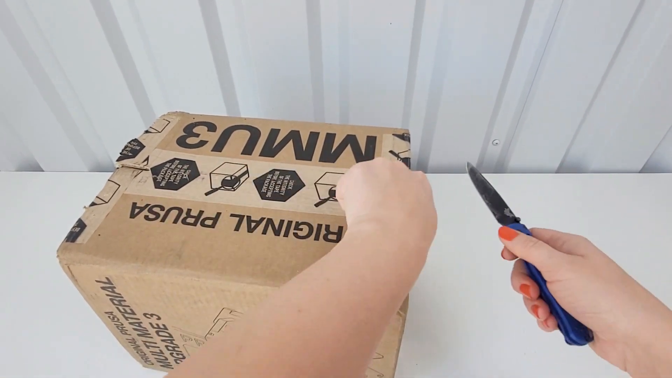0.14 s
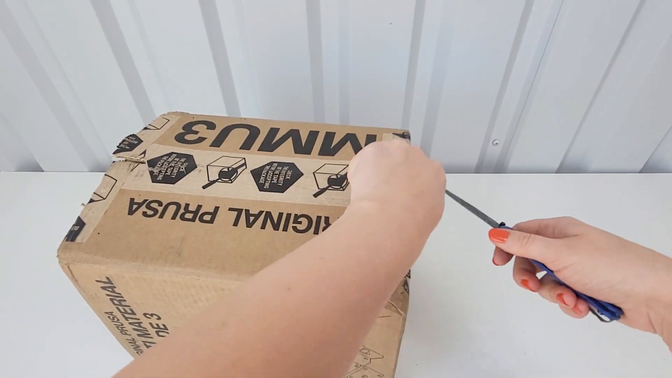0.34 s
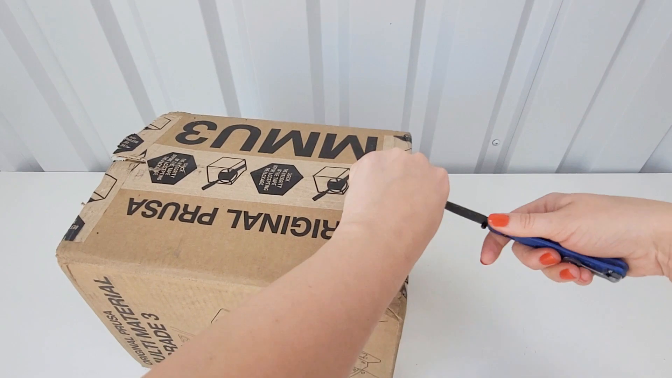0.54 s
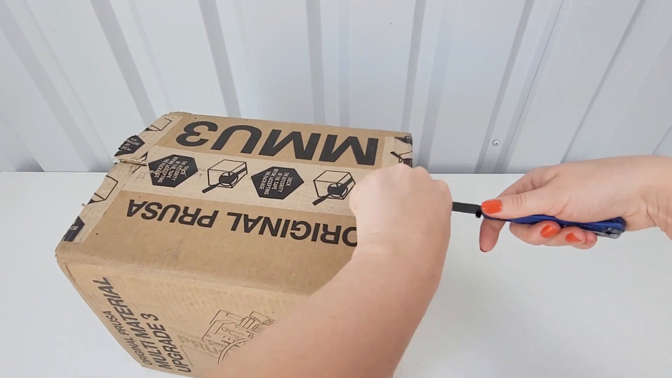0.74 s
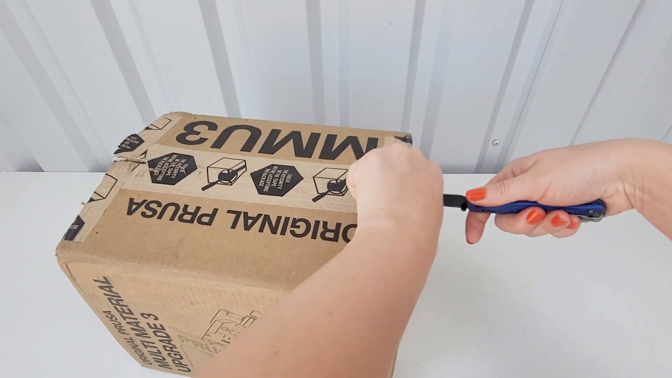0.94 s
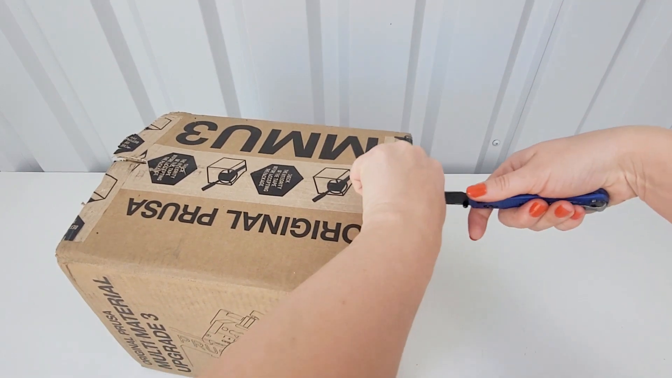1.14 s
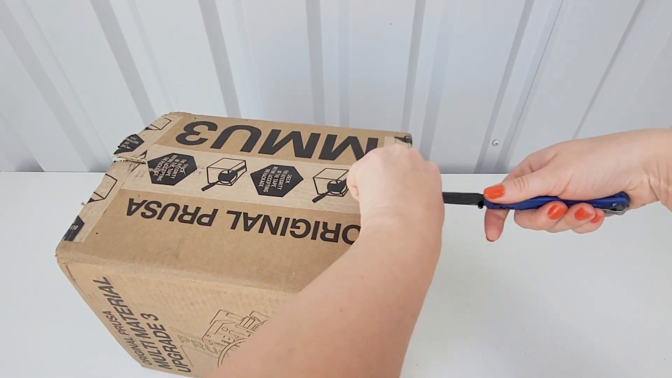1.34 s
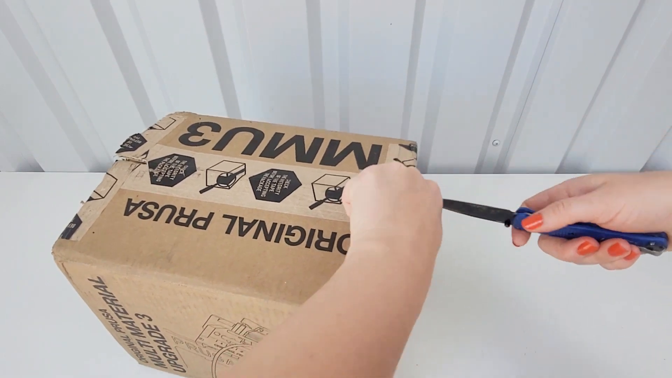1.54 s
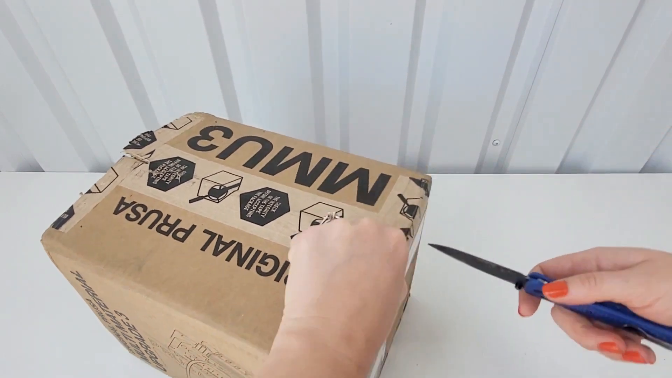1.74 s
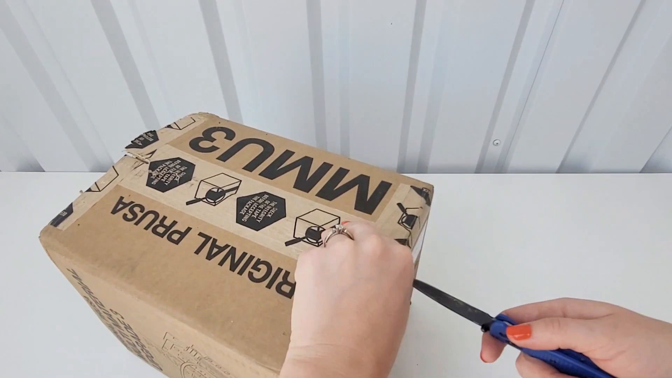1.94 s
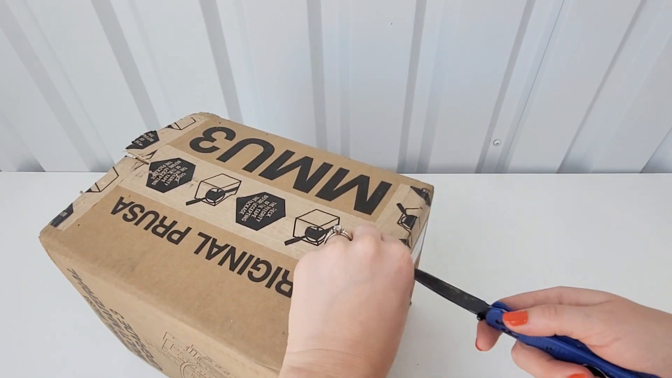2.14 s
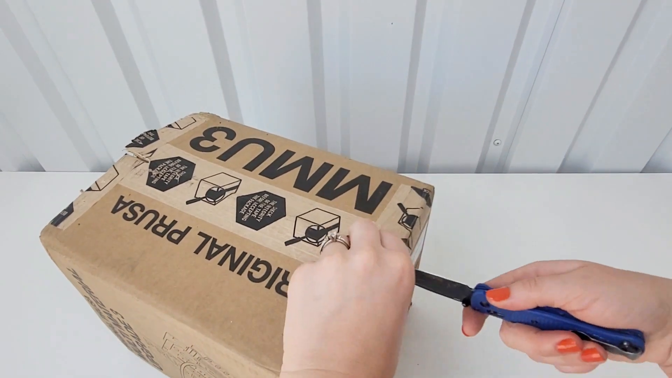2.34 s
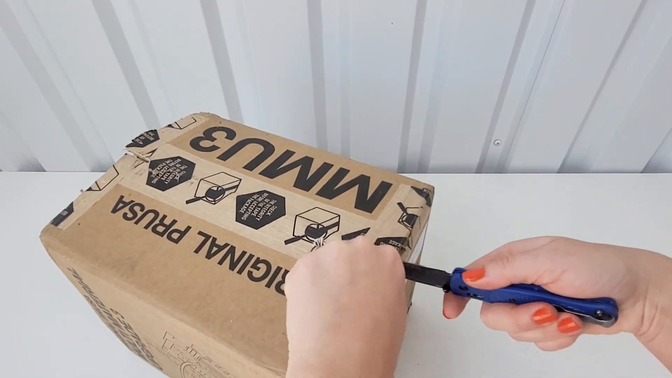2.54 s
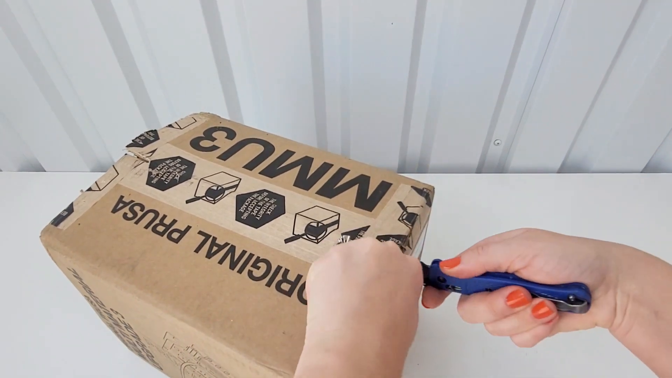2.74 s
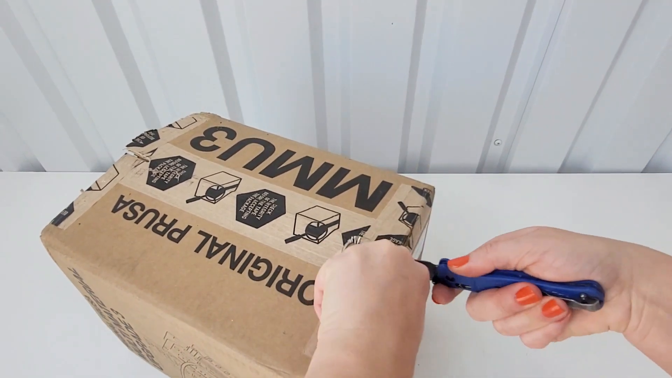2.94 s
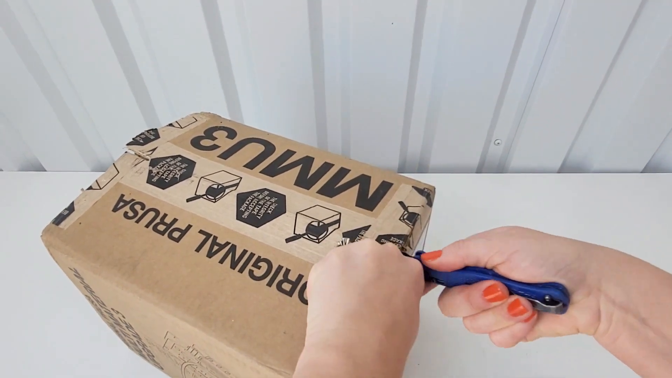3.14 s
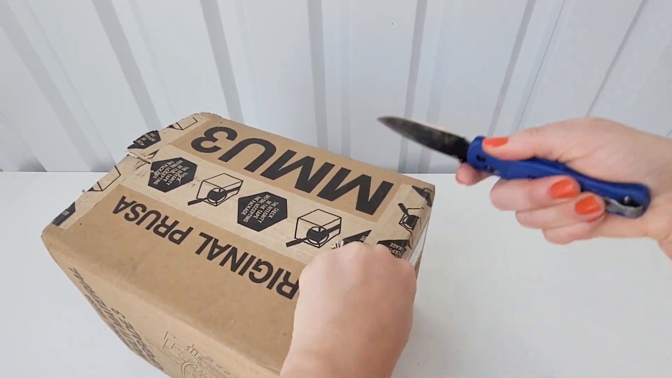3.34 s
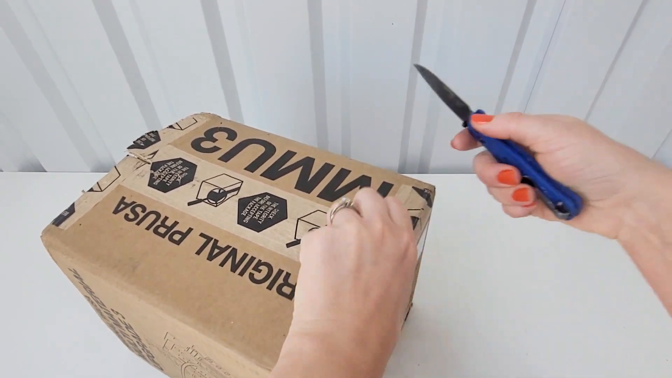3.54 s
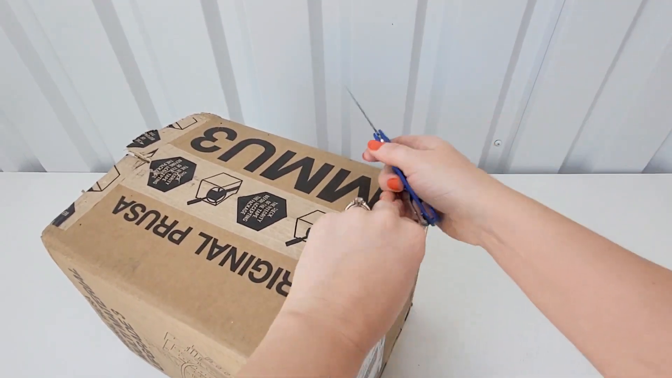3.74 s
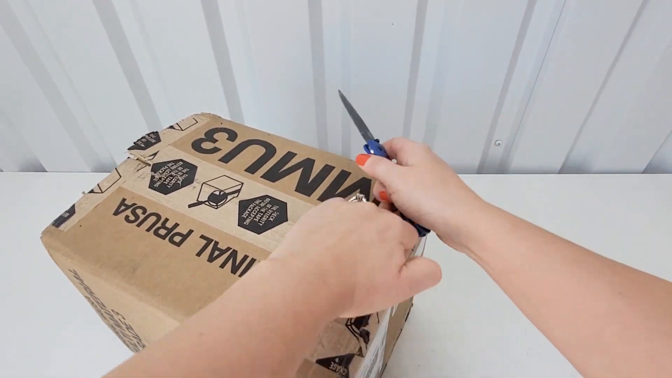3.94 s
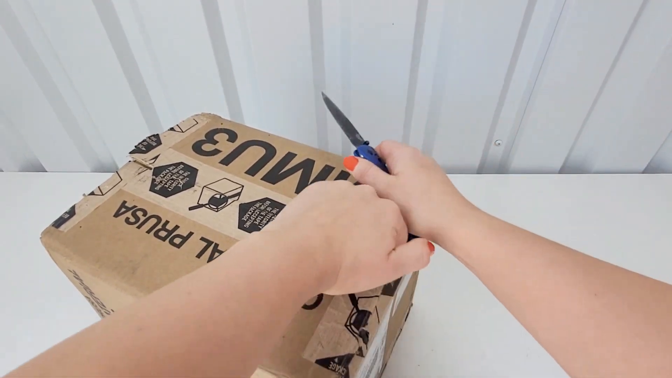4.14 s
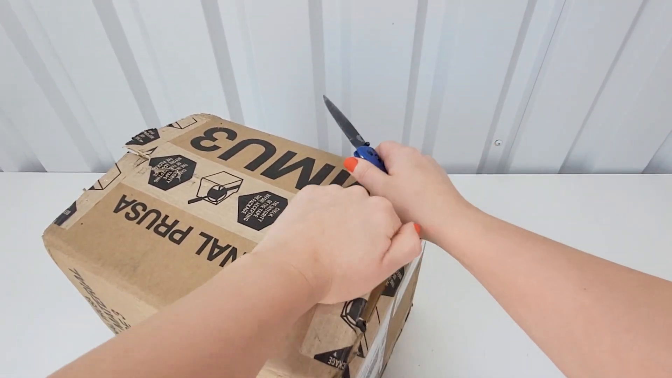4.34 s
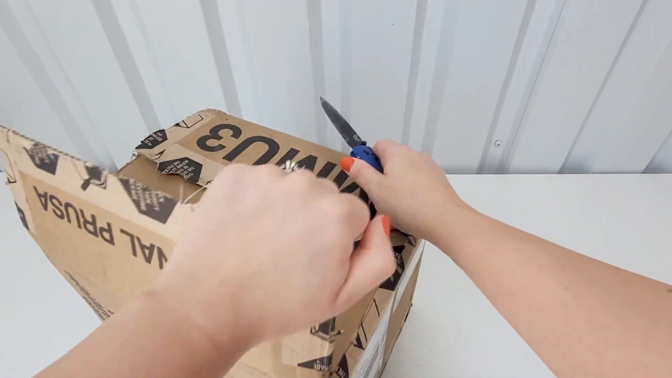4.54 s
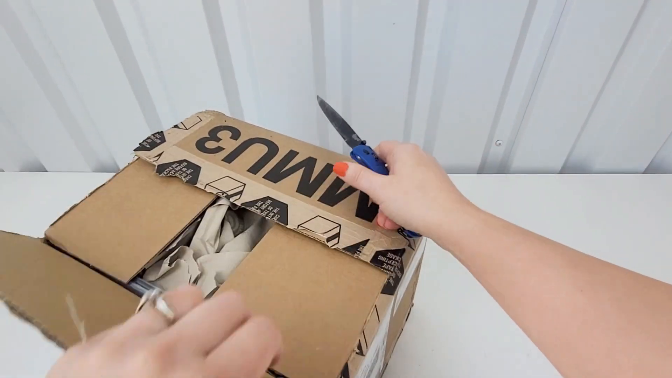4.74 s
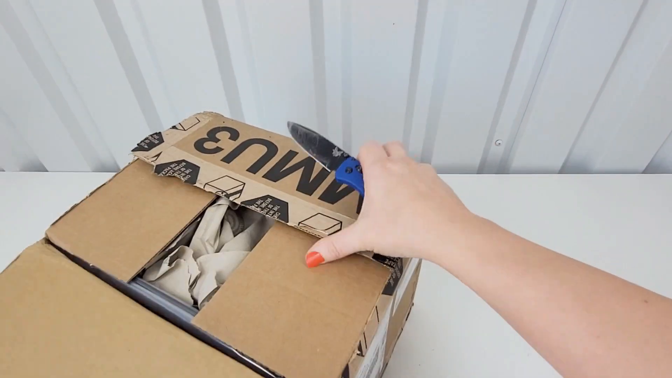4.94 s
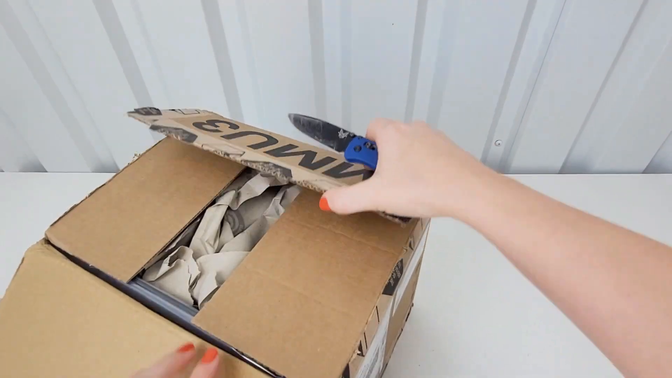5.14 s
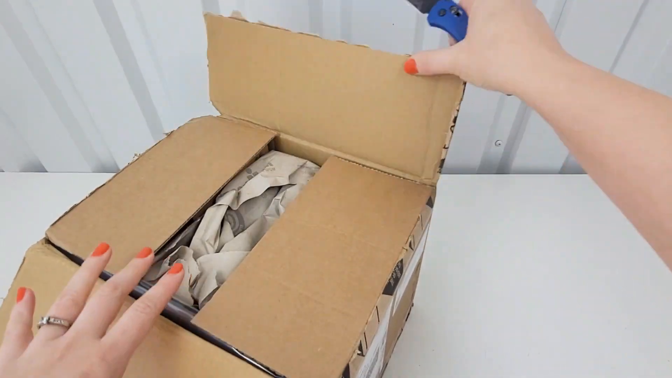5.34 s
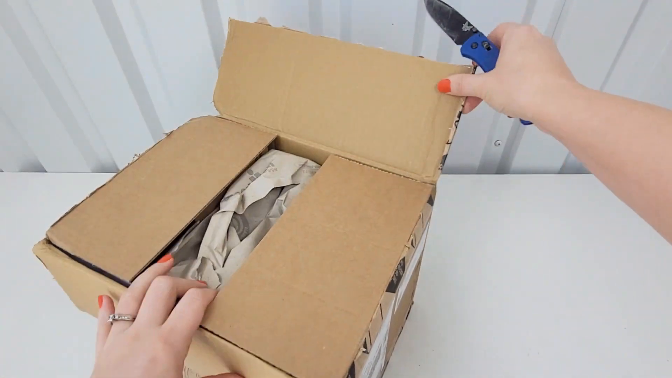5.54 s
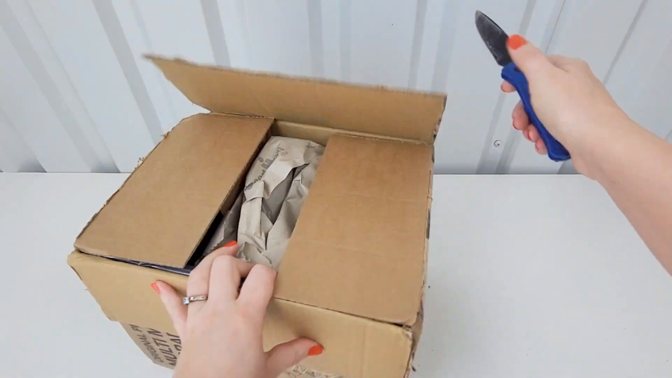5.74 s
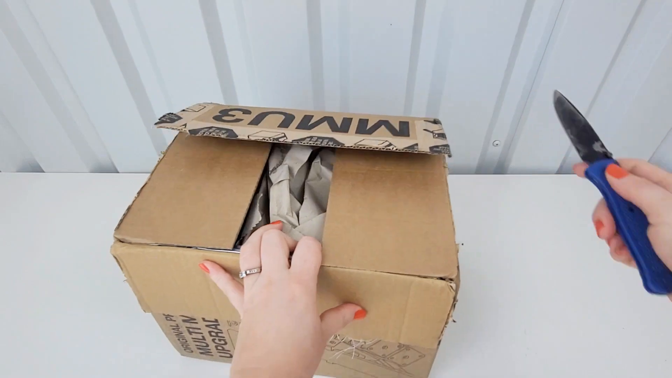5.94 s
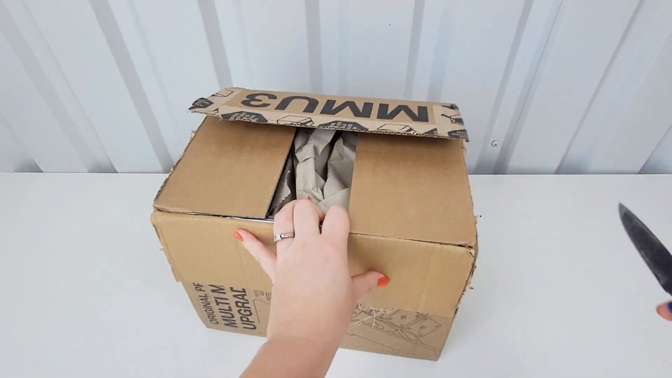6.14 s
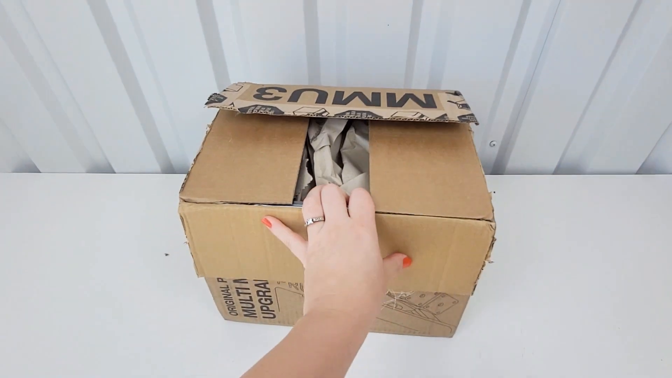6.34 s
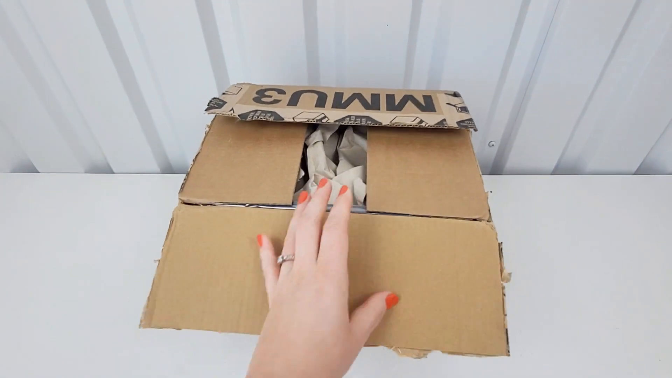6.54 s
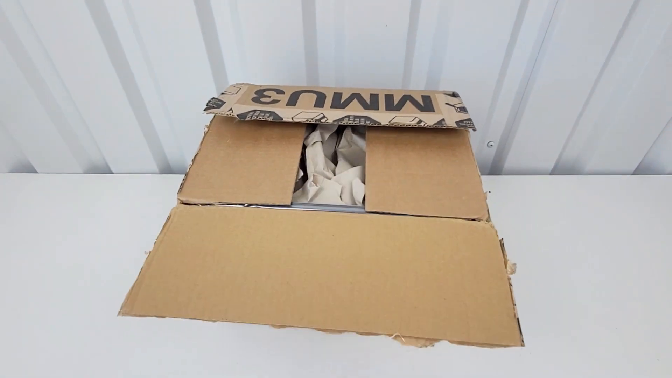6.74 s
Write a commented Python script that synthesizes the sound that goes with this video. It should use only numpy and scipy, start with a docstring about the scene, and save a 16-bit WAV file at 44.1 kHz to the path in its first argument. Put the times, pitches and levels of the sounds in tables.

```python
"""Slitting open a cardboard box

A folding knife slits the packing tape on a box on a table in a small room, over a low electric hum.
A hand slides over the lid, the blade saws, the tape parts in snaps of tiny fractures and the panels
thump as they spring free, ringing the hollow box. The flaps creak back and the box is dragged round.
Each rub is stick-slip friction: dense clicks, louder and brighter with speed."""
import sys
import numpy as np
from scipy import signal
from scipy.fft import rfft, irfft
from scipy.io import wavfile

SR = 44100
rng = np.random.default_rng(int(sys.argv[2]) if len(sys.argv) > 2 else 0)


def persist_wave(psi):
    """Save psi, clipped to +-1, as 16-bit WAV."""
    counts = np.round(np.clip(psi, -1, 1) * 32767).astype(np.int16)
    wavfile.write(sys.argv[1], SR, np.atleast_2d(counts).T)


N = 303395
TIME = np.arange(N) / SR
# board fibres tearing: f/Hz, density/dB
RASP_SPECTRUM = [(300, -21), (700, 3), (1150, 3), (1900, -3.5), (2500, -3.5), (3500, 0.5), (5500, -6.5),
                 (9000, -22)]
# flaps rubbing: f/Hz, density/dB
FLAP_SPECTRUM = [(180, 7.5), (300, 4.5), (480, 5.5), (750, 0), (1100, 0.5), (1500, -3.5), (1850, -7),
                 (2250, -7.5), (2700, -8), (3500, -8), (7000, -19.5), (11000, -18), (14200, -13.5),
                 (16000, -19)]


def from_db(db):
    """Decibels to gain."""
    return 10 ** (np.asarray(db) / 20)


def unit_rms(x):
    """Scale to unit power."""
    return x / np.sqrt(np.mean(x ** 2) + 1e-20)


def at_hz(points, hz):
    """Read a table on a log-frequency axis."""
    f, value = np.transpose(points)
    return np.interp(np.log(np.maximum(hz, 1)), np.log(f), value)


def band(x, low_hz, high_hz, order=3):
    """Butterworth band-pass."""
    return signal.sosfilt(signal.butter(order, [low_hz, high_hz], "band", fs=SR, output="sos"), x)


def colour(x, spectrum, size=4096):
    """Minimum-phase filter of unit energy, rolling off below the spectrum's first point."""
    hz = np.fft.rfftfreq(size, 1 / SR)
    corner_hz = .5 * spectrum[0][0]
    gain = from_db(at_hz(spectrum, hz)) / (1 + (corner_hz / np.maximum(hz, 1)) ** 2)
    cepstrum = irfft(np.log(gain))
    cepstrum[1:size // 2] *= 2
    cepstrum[size // 2 + 1:] = 0
    response = irfft(np.exp(rfft(cepstrum)))
    return signal.fftconvolve(x, response / np.linalg.norm(response))[:N]


def resonance(x, hz, width_hz):
    """Two-pole resonance, peak gain 1."""
    r = np.exp(-np.pi * width_hz / SR)
    feedforward = np.array([1, 0, -1]) * (1 - r * r) / 2
    feedback = [1, -2 * r * np.cos(2 * np.pi * hz / SR), r * r]
    return signal.lfilter(feedforward, feedback, x + 1e-18)


def body(x, modes):
    """A body rings at its modes."""
    return sum(from_db(db) * resonance(x, hz, width_hz) for hz, width_hz, db in modes)


def drift(per_s):
    """Random line through unit-variance knots."""
    knots = rng.standard_normal(4000)
    return np.interp(TIME * per_s, np.arange(len(knots)), knots)


def grains(per_s, spread_db):
    """Fibres catch and let go: random clicks, unit power."""
    sizes = from_db(spread_db * np.minimum(rng.exponential(1, N), 4))
    signs = rng.choice([-1, 1], N)
    return unit_rms(sizes * signs * (rng.random(N) < per_s / SR))


def add(track, at_s, sound):
    """Mix in a short sound."""
    start = round(at_s * SR)
    track[start:start + len(sound)] += sound[:N - start]


def swell_db(peak_s, rise_s, fall_s, shape):
    """Stroke envelope, -12.5 dB at rise_s before and fall_s after the peak; shape 1 pointed, 2 round."""
    away = np.maximum((peak_s - TIME) / rise_s, (TIME - peak_s) / fall_s)
    return -12.5 * np.minimum(away, 8) ** shape


def slide(strokes, spectrum, per_s, spread_db, judder_db, gain_db, shape, modes=()):
    """Juddering stick-slip friction; hiss, set relative to the stroke level, grows faster with speed."""
    scrape_gain, hiss_gain = np.zeros((2, N))
    for peak_s, rise_s, fall_s, level_db, hiss_db in strokes:
        speed_db = swell_db(peak_s, rise_s, fall_s, shape)
        scrape_gain = np.maximum(scrape_gain, from_db(level_db + speed_db))
        hiss_gain = np.maximum(hiss_gain, from_db(level_db + hiss_db + 1.36 * speed_db))
    rub = colour(grains(per_s, spread_db), spectrum) * from_db(judder_db * drift(per_s=110))
    rub = rub + from_db(6) * body(rub, modes)
    hiss = unit_rms(band(rub, 6500, 20000))
    scrape = band(rub, 60, 6500) / np.std(band(rub, 500, 6000))
    return from_db(gain_db) * (scrape_gain * scrape + hiss_gain * hiss)


def wander(x, depth_db):
    """Each half-octave comes and goes as the contact moves over the board."""
    edges_hz = np.geomspace(800, 12800, 9)
    out = x
    for low_hz, high_hz in zip(edges_hz, edges_hz[1:]):
        gain = from_db(depth_db * drift(per_s=14))
        out = out + (gain - 1) * band(x, low_hz, high_hz, order=1)
    return out


def hum_and_air(hum_hz=58.45, air_db=-11):
    """Electric hum with two close lines that beat, over room air; both sink and recover."""
    # hum lines: multiple of hum_hz, level/dB
    lines = [(1, -1), (2, -7.5), (2.06, -14.5), (3, -7), (4, -21)]
    # joint envelope: t/s, level/dB
    levels = [(0, -53), (0.7, -52.5), (1.6, -50.5), (4.3, -53), (4.6, -59), (5.3, -58.5), (5.9, -53.5),
              (6.5, -51), (6.88, -55)]
    # still air: f/Hz, density/dB
    air_spectrum = [(25, -30.5), (50, -14), (80, -4), (130, 2.5), (200, -4.5), (300, -9.5), (480, -10.5),
                    (900, -17), (1300, -34), (2200, -43), (4500, -30), (8000, -45), (16000, -38.5)]
    hum = sum(from_db(db) * np.sin(2 * np.pi * (k * hum_hz * TIME + rng.random())) for k, db in lines)
    air = unit_rms(colour(rng.standard_normal(N), air_spectrum))
    level_db = np.interp(TIME, *np.transpose(levels))
    return from_db(level_db) * (np.sqrt(2) * hum + from_db(air_db) * air)


def room(x, first_echo_s=0.01):
    """Diffuse echoes die away band by band."""
    # reverberation time: f/Hz, T60/s
    t60 = [(100, 0.37), (300, 0.18), (600, 0.37), (1500, 0.42), (4000, 0.4), (9000, 0.34), (16000, 0.13)]
    # echo strength: f/Hz, level/dB
    wet = [(250, -14), (1500, -8), (13000, -13)]
    t, response = TIME[:SR * 3 // 4], 0
    edges_hz = np.geomspace(70, 18000, 10)
    for low_hz, high_hz in zip(edges_hz, edges_hz[1:]):
        hz = np.sqrt(low_hz * high_hz)
        decay = from_db(-60 * t / at_hz(t60, hz)) * (t > first_echo_s)
        echoes = band(rng.standard_normal(len(t)), low_hz, high_hz) * decay / np.linalg.norm(decay)
        response = response + from_db(at_hz(wet, hz)) * echoes
    return signal.fftconvolve(x, response)[:N]


def crease(hz=775, width_hz=150, rub_db=0.5):
    """The front flap bends down: its fold slips in a rough squeak and rubs on itself."""
    # bends: t/s, rise/s, fall/s, level/dB
    bends = [(6.45, 0.09, 0.041, -67.5), (6.71, 0.75, 0.38, -59)]
    slips = grains(per_s=900, spread_db=3.2)
    squeak = resonance(resonance(slips, hz, width_hz), hz, width_hz)
    rub = colour(grains(per_s=9000, spread_db=1.4), FLAP_SPECTRUM)
    envelope = sum(from_db(db + swell_db(*timing, shape=1.44)) for *timing, db in bends)
    return envelope * (unit_rms(squeak) + from_db(rub_db) * unit_rms(rub))


def creaks(edge_s=0.0061, rasp_db=-15.5, gain_db=2.5):
    """A fold gives in a short run of slips that ring one patch of board."""
    # creaks: t/s, level/dB, f/Hz
    events = [(4.747, -46, 2230), (4.793, -49, 1830), (4.986, -44, 1670), (5.014, -47.5, 1810),
              (5.264, -49.5, 1450), (6.365, -47, 1190)]
    rasp = unit_rms(colour(grains(per_s=3000, spread_db=2.5), RASP_SPECTRUM))
    out = np.zeros(N)
    for at_s, db, hz in events:
        patch = unit_rms(resonance(rasp, hz, width_hz=300))
        envelope = from_db(db + gain_db + swell_db(at_s, edge_s, edge_s, shape=1.4))
        out += envelope * (patch + from_db(rasp_db) * rasp)
    return out


def grip():
    """The hand rubs the board as it shifts its hold."""
    # shifts: t/s, rise/s, fall/s, level/dB, hiss/dB
    strokes = [(0.1, .2, 0.067, -61.5, -6), (0.18, 0.051, 0.058, -49, -6.5),
               (0.248, 0.059, 0.027, -51, -4.5), (0.59, .1, 0.058, -52.5, -4),
               (0.648, 0.034, 0.034, -45, -3), (0.84, 0.248, 0.15, -55, -4.5),
               (1.05, .12, 0.178, -70.5, -14), (1.35, 0.145, 0.089, -64, 1.5)]
    # hand on board: f/Hz, density/dB
    spectrum = [(130, -42), (220, 0.5), (539, -6), (623, -6.5), (681, -11), (1110, -10), (2190, -19.5),
                (4400, -20), (5760, -25.5), (9860, -27), (13900, -26), (16000, -33.5)]
    return slide(strokes, spectrum, per_s=5000, spread_db=0, judder_db=1.5, gain_db=-3.5, shape=1.43)


def palm():
    """The palm sweeps over the lid."""
    # sweeps: t/s, rise/s, fall/s, level/dB, hiss/dB
    strokes = [(1.48, 0.059, .06, -51, -1), (1.61, .15, 0.18, -44, 2)]
    # palm on lid: f/Hz, density/dB
    spectrum = [(220, -0.5), (500, 1), (850, -0.5), (1200, 2), (2000, 2.5), (2700, 4.5), (3600, 2),
                (5200, -3.5), (6500, -11.5), (10000, -15), (14400, -15.5), (16000, -21)]
    return slide(strokes, spectrum, per_s=25000, spread_db=3.5, judder_db=0.5, gain_db=-2, shape=1.84)


def fingers():
    """Fingers skim the flaps as the box turns."""
    # skims: t/s, rise/s, fall/s, level/dB, hiss/dB
    strokes = [(5.56, 0.043, 0.3, -45, -0.5), (5.7, 0.25, 0.14, -42.5, 2.5),
               (6.05, 0.13, 0.233, -60.5, 19.5), (6.41, 0.13, 0.1066, -47.5, 0),
               (6.565, 0.17, 0.051, -60.5, 5)]
    # fingers on flaps: f/Hz, density/dB
    spectrum = [(250, 7), (500, 5), (800, -3.5), (1400, 0), (3000, -1.5), (5000, -4), (8000, 0.5),
                (12000, 0.5), (14200, 3.5), (16000, -5)]
    return slide(strokes, spectrum, per_s=15000, spread_db=-1, judder_db=1.6, gain_db=-3, shape=1.54)


def flaps():
    """The flaps rub as they swing open."""
    # swings: t/s, rise/s, fall/s, level/dB, hiss/dB
    strokes = [(4.75, 0.045, 0.096, -50, -0.5), (4.875, 0.19, 0.13, -52.5, 0),
               (4.99, 0.034, 0.076, -48, -5.5), (5.15, 0.11, 0.15, -55, 0.5),
               (5.267, 0.045, 0.036, -52.5, 1), (5.385, 0.12, 0.074, -57.5, 5),
               (5.478, 0.043, 0.0497, -46, -5)]
    return slide(strokes, FLAP_SPECTRUM, per_s=3900, spread_db=1, judder_db=3, gain_db=-0.5, shape=1.2)


def drag():
    """The box scrapes round on the table."""
    # pulls: t/s, rise/s, fall/s, level/dB, hiss/dB
    strokes = [(6.12, .41, 0.18, -41, -2), (6.41, .03, 0.0256, -53.5, 0)]
    # box on table: f/Hz, density/dB
    spectrum = [(130, -31), (220, -21), (263, -3), (391, -15), (435, -4.5), (612, -8.5), (669, -8.5),
                (907, -8), (1350, -0.5), (1500, -2), (2030, -1.5), (4090, -6.5), (12700, -13), (14100, -16),
                (16000, -10.5)]
    return slide(strokes, spectrum, per_s=20000, spread_db=1, judder_db=0.7, gain_db=-1.5, shape=3.4)


def singing(q=2):
    """At full speed a slide catches and slips at a favoured rate, singing in one broad band."""
    # fast slides: t/s, rise/s, fall/s, level/dB, f/Hz
    strokes = [(1.6, .07, .09, -46.5, 4950), (6.06, .11, 0.067, -45, 2490)]
    catches = grains(per_s=12000, spread_db=2.4)
    out = np.zeros(N)
    for *timing, db, hz in strokes:
        song = resonance(resonance(catches, hz, hz / q), hz, hz / q)
        out += from_db(db + swell_db(*timing, shape=1.9)) * unit_rms(song)
    return out


def blade_probe():
    """The blade scrapes, feeling for the seam."""
    # scrapes: t/s, rise/s, fall/s, level/dB, hiss/dB
    strokes = [(1.87, 0.019, 0.025, -53, -7.5), (1.99, 0.097, 0.14, -61, -1), (2.28, 0.287, .08, -60, -3.5),
               (2.45, 0.2, 0.15, -55, -7.5), (2.63, .06, 0.059, -61, 3)]
    # blade on lid: f/Hz, density/dB
    spectrum = [(180, 7.5), (330, 6), (650, -0.5), (1300, -4), (2300, -12.5), (3300, -6), (4300, -9),
                (5600, -11), (8000, -12.5), (11500, -14), (14000, -12), (16000, -16)]
    return slide(strokes, spectrum, per_s=14000, spread_db=3.5, judder_db=3, gain_db=-2, shape=1.8)


def blade_saw():
    """The blade saws along the seam, ringing the taut tape and the lid."""
    # cuts: t/s, rise/s, fall/s, level/dB, hiss/dB
    strokes = [(2.665, 0.085, 0.065, -49, -8), (2.795, 0.054, 0.042, -47.5, -10.5),
               (2.97, 0.072, 0.19, -43, -5.5)]
    # blade in seam: f/Hz, density/dB
    spectrum = [(200, 7), (400, 7.5), (800, -1.5), (2500, -3.5), (5000, -6), (7500, -1.5), (11000, -0.5),
                (14000, 2.5), (16000, -9)]
    # tape and lid modes: f/Hz, width/Hz, level/dB
    lid_modes = [(510, 67, 2), (1270, 150, 7.5), (1603, 126, -8), (1825, 140, 5.5), (3300, 970, -8)]
    return slide(strokes, spectrum, per_s=3300, spread_db=-0.5, judder_db=1.5, gain_db=-1.5, shape=1.53,
                 modes=lid_modes)


def tape_peel():
    """The tape stretches and peels in coarse, juddering grains."""
    # pulls: t/s, rise/s, fall/s, level/dB, hiss/dB
    strokes = [(3.178, 0.043, 0.035, -35, -1.5), (3.31, 0.05, 0.1, -55, -5),
               (3.51, 0.082, 0.11, -69.5, 5.5), (3.72, 0.15, 0.082, -52.5, -0.5),
               (3.855, 0.058, 0.032, -41, -8), (3.93, 0.05, 0.04, -43, 7.5), (4.2, 0.09, .12, -44.5, 2),
               (4.42, 0.092, 0.092, -33, 0), (4.56, 0.042, 0.14, -52, -1)]
    # peeling tape: f/Hz, density/dB
    spectrum = [(100, 5), (130, -6), (263, 1), (356, -3), (543, -3.5), (651, -15), (1290, -9),
                (1680, -13.5), (2670, -11.5), (11100, -30.5), (14500, -27.5), (16000, -35)]
    return slide(strokes, spectrum, per_s=2500, spread_db=1.5, judder_db=4, gain_db=0, shape=1.6)


def jogs(per_s=16):
    """Light random bumps from handling, as rows of t/s, level/dB, f/Hz."""
    # handling spells: start/s, end/s
    spells = [(0.141, 0.28), (2.301, 2.52)]
    rows = []
    for start_s, end_s in spells:
        for at_s in np.arange(start_s, end_s, 1 / per_s):
            late_s = rng.uniform(0, .5 / per_s)
            rows.append((at_s + late_s, rng.uniform(-56.5, -48.5), rng.uniform(175, 396)))
    return rows


def panel_knocks(decay_cycles=1.754, gentle_db=-38.5, swing_db=-4.5, slap_db=-8.5):
    """A panel swings for a few cycles at its own pitch while its edge slaps the board beneath."""
    # panels sprung or bumped: t/s, level/dB, f/Hz
    knocks = [(0.625, -47.5, 350), (2.047, -46.5, 215), (2.977, -32.5, 480), (2.99, -24, 352),
              (3.001, -26.5, 160), (3.018, -29, 232.8), (3.116, -36.5, 180), (3.156, -21, 206),
              (3.165, -23.5, 232), (3.172, -26, 157), (3.186, -26.5, 340), (3.196, -29, 209),
              (3.207, -39, 129.5), (3.343, -45, 332), (3.603, -41, 355), (3.615, -39.5, 310),
              (3.667, -40, 440), (3.841, -34, 202), (3.865, -35.5, 184.2), (3.908, -44, 213),
              (4.008, -42.5, 204), (4.161, -31.5, 262), (4.209, -17, 537), (4.215, -21.5, 226),
              (4.299, -33, 278.6), (4.376, -13.5, 434), (4.397, -13.5, 240), (4.415, -14, 256),
              (4.43, -13, 300), (4.444, -19, 527), (5.048, -24, 435), (5.072, -38, 462),
              (5.268, -44.5, 351), (5.381, -45.5, 286), (5.592, -38, 310), (5.655, -33, 332),
              (5.71, -47, 426), (6.073, -50.5, 484), (6.405, -44.5, 339), (6.444, -44, 450),
              (6.565, -47, 346)]
    # edge slap: f/Hz, density/dB
    slap_spectrum = [(130, -10), (250, 9), (600, 5.5), (1100, -8), (1800, -14), (4000, -21),
                     (12000, -71.5)]
    swing, contact = np.zeros((2, N))
    t = TIME[:SR // 10]
    for at_s, db, hz in knocks + jogs():
        press_s = 0.00069 * from_db(0.92 * max(gentle_db - db, 0))   # gentle touches press in slower
        envelope = (1 - np.exp(-t / press_s)) * np.exp(-t / (decay_cycles / hz + press_s))
        envelope *= from_db(db) / np.sqrt(np.sum(envelope ** 2) / (.014 * SR))   # energy of 14 ms at db
        add(swing, at_s, np.sqrt(2) * envelope * np.sin(2 * np.pi * hz * t))
        add(contact, at_s, envelope)
    slap = colour(rng.standard_normal(N), slap_spectrum)
    return band(from_db(swing_db) * swing + from_db(slap_db) * contact * slap, 78, 14000, order=2)


def tape_snaps(quick_s=0.0065, crack_gain_db=3, rasp_gain_db=-0.5):
    """Runs of tiny fractures: the film cracks brightly, the board rasps and a patch of it rings."""
    # tape and fibres giving way: t/s, length/s, crack/dB, rasp/dB, patch f/Hz
    snaps = [(0.25, 0.00224, -64.5, -48, 1410), (0.308, 0.0019, -59, -75, 1380),
             (1.199, 0.0024, -59, -64, 5680), (1.219, 0.0076, -57.5, -59, 1200),
             (1.997, 0.00097, -40, -53, 3800), (2.046, 0.0058, -50, -46.5, 5900),
             (2.137, 0.016, -58.5, -56.5, 1630), (2.806, 0.0053, -50, -52, 1780),
             (2.863, 0.0032, -59, -78, 1500), (2.975, 0.0037, -34, -27.5, 3520),
             (2.986, 0.0076, -33, -31, 1080), (3.009, 0.0157, -34.5, -34, 2380),
             (3.112, 0.023, -44.5, -40.5, 1233), (3.153, 0.0052, -23.5, -32.5, 950),
             (3.162, 0.0078, -29, -38.5, 3600), (3.175, 0.0114, -28, -35, 2960),
             (3.341, 0.0096, -48.5, -43.5, 1080), (3.618, 0.0045, -48, -50.5, 2660),
             (3.667, 0.0089, -39, -33.5, 970), (3.721, 0.00083, -32.5, -52.5, 4880),
             (3.903, 0.0034, -27.5, -29.5, 3600), (4.007, 0.00566, -48, -44, 1150),
             (4.147, 0.005, -39.5, -32.5, 5540), (4.1593, 0.0069, -21.5, -22.5, 1950),
             (4.195, 0.012, -26, -27, 1660), (4.207, 0.0072, -25.5, -20, 1900),
             (4.297, 0.011, -37.5, -31.5, 1660), (4.345, 0.0026, -17.5, -29, 6400),
             (4.353, 0.018, -21.5, -28, 1700), (4.3721, 0.007, -31, -16.5, 1600),
             (4.383, 0.0066, -28.5, -23, 1340), (4.394, 0.0092, -37, -19.5, 1110),
             (4.41, 0.012, -38, -26, 920), (4.429, 0.0138, -38, -22, 1640), (4.453, 0.0025, -51, -22, 1240),
             (5.052, 0.0027, -48, -46, 650), (5.065, 0.0088, -61.5, -45, 1370),
             (6.399, 0.018, -45.5, -40.5, 1340), (6.433, 0.012, -48.5, -43.5, 1280)]
    # film cracking: f/Hz, density/dB
    crack_spectrum = [(1500, -63), (3500, 1.5), (6000, 2.5), (10000, 8), (14500, 6.5), (16500, 8.5)]
    film = colour(grains(per_s=9000, spread_db=5), crack_spectrum)
    board = colour(grains(per_s=7000, spread_db=5), RASP_SPECTRUM)
    t, out = TIME[:SR // 20], np.zeros(N)
    for at_s, length_s, crack_db, rasp_db, hz in snaps:
        hold_s, decay_s = .6 * length_s, .0014 + .35 * length_s
        envelope = np.exp(-np.maximum(t - hold_s, 0) / decay_s)
        if length_s < quick_s:
            envelope += from_db(-9) * np.exp(-t / 0.0005)   # a quick snap breaks hardest at once
        else:
            envelope *= 1 - np.exp(-t / 0.00013)   # a longer tear builds up
        strength = np.sqrt(np.mean(envelope ** 2))
        start = rng.integers(N - len(t))
        crack = unit_rms(envelope * film[start:start + len(t)])
        tear = unit_rms(envelope * board[start:start + len(t)])
        patch = unit_rms(resonance(tear, hz, width_hz=380))
        add(out, at_s, from_db(crack_db + crack_gain_db) * strength * crack)
        add(out, at_s, from_db(rasp_db + rasp_gain_db) * strength * unit_rms(tear + patch))
    return out


def scene():
    """Snaps and knocks ring the box; hands, blade and table rub on it; all echo in the room."""
    # hollow box modes: f/Hz, width/Hz, level/dB
    box_modes = [(175, 25, 5), (247, 44, -3.5), (294.6, 15, 0), (444, 34, -4), (540, 26, 5.5),
                 (561.7, 11, 1), (680, 30, -3), (1117, 130, -4.5), (1416, 35, 2.5), (1710, 120, 2)]
    blows = tape_snaps() + panel_knocks()
    box_ring = from_db(-5) * body(blows, box_modes)
    rubbing = grip() + palm() + blade_probe() + blade_saw() + tape_peel() + flaps() + fingers() + drag()
    direct = blows + box_ring + wander(rubbing, depth_db=1.6) + singing() + creaks() + crease()
    return (direct + room(direct) + hum_and_air())[None]


def record(dry, ceiling=0.7, low_cut_hz=18.4, high_cut_hz=15750):
    """Round the peaks; cut the deepest bass and the top."""
    rounded = ceiling * np.tanh(dry / ceiling)
    high_pass = signal.butter(4, low_cut_hz, "high", fs=SR, output="sos")
    low_pass = signal.ellip(10, .05, 60, high_cut_hz, fs=SR, output="sos")
    return signal.sosfiltfilt(low_pass, signal.sosfilt(high_pass, rounded))


dry = scene()
out = record(dry)
persist_wave(out)
```